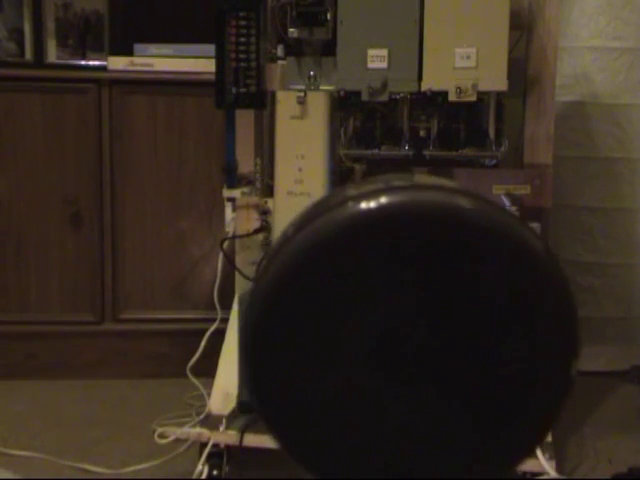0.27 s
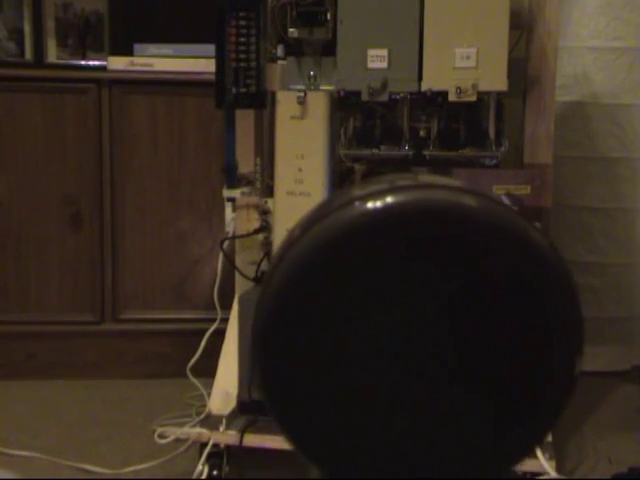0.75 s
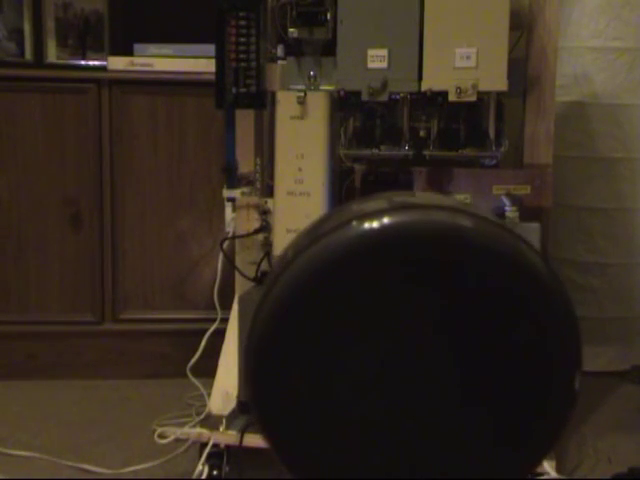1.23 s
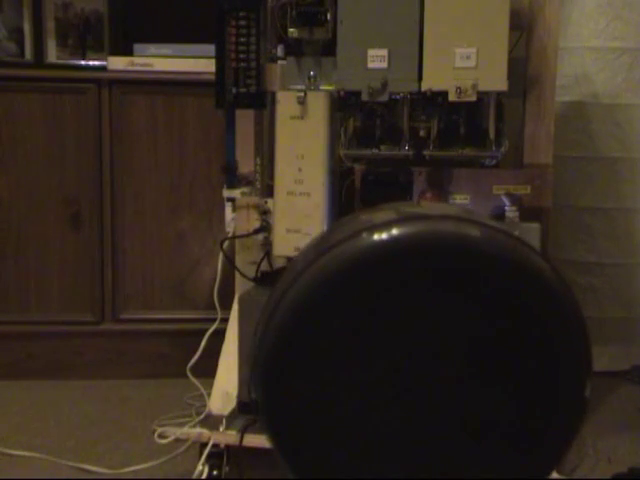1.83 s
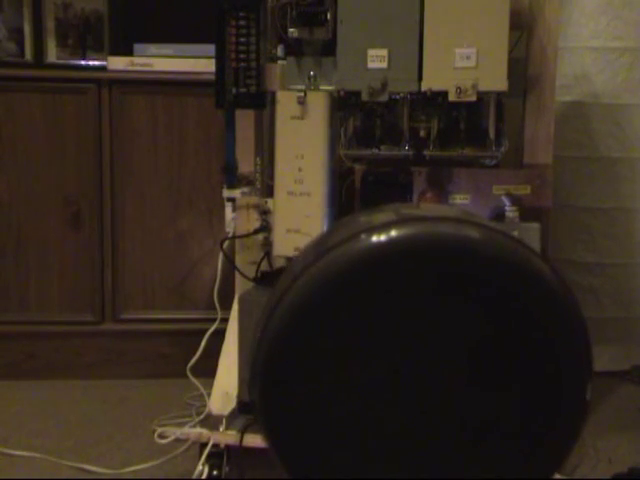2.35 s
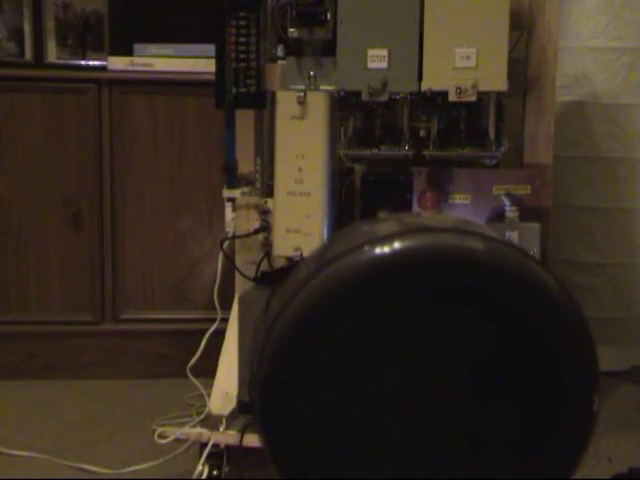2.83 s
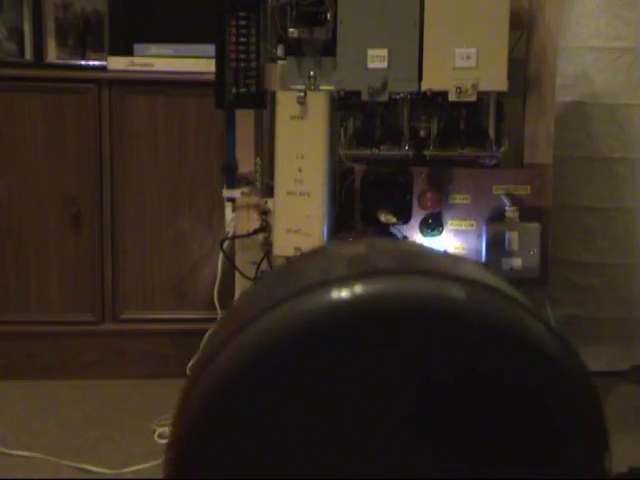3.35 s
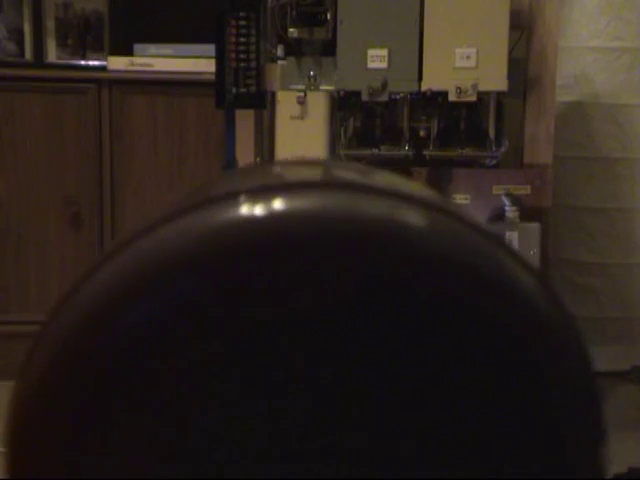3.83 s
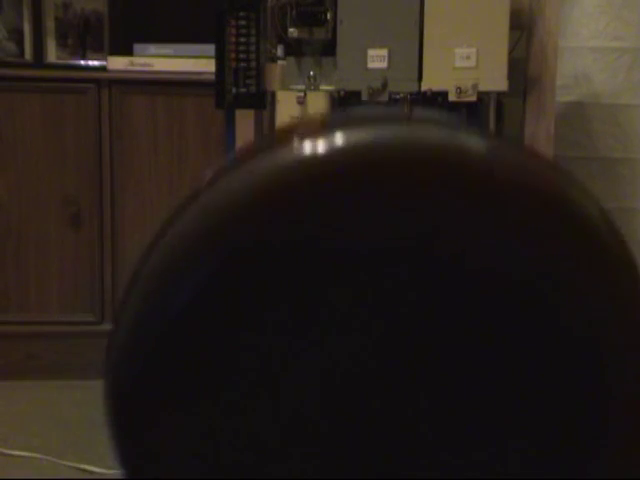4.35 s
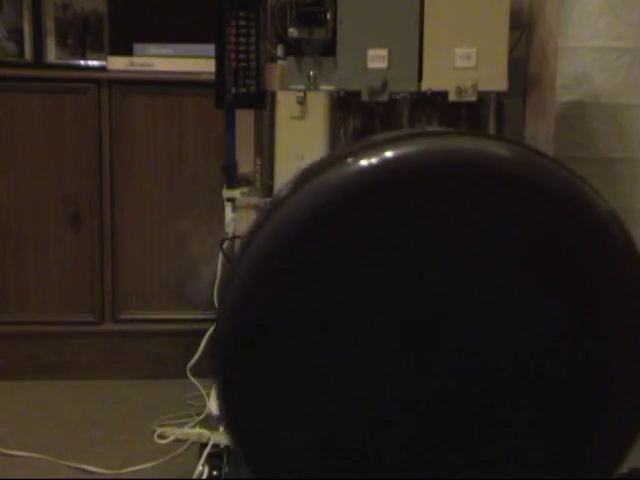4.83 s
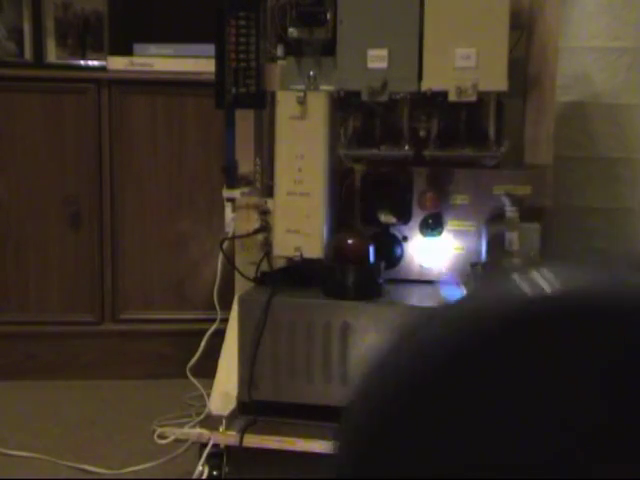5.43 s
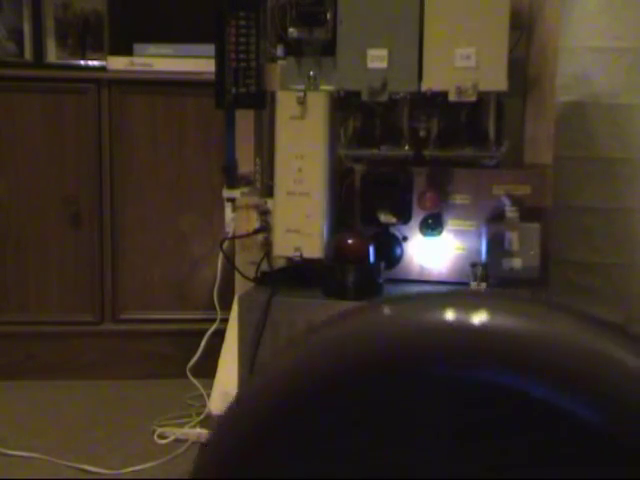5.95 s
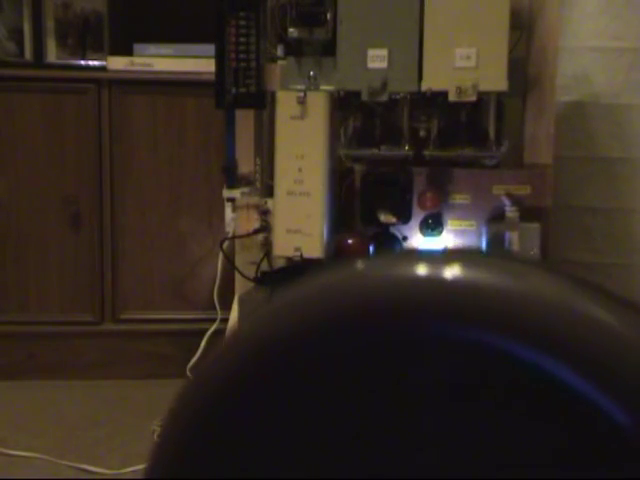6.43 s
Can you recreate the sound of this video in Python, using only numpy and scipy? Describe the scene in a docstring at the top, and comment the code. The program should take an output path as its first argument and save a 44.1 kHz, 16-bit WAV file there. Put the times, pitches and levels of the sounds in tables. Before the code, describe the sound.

Metallic telephone switchgear clatters in a living room as a dial is turned: scattered clacks, six quick double clacks, then ten more over faint hum.

```python
"""A living room, with a rotary telephone and a small step-by-step exchange that is sent 1, 6 and 0.
The finger winds the dial over its ratchet and its gears rustle home; shaped noise and clear modes make each knock.
On each pulse of the 6 and 0 a magnet pulls in and falls back, lifting the wiper shaft, then turning it.
The rack rings under the selectors and relays click; all are struck metalwork built from dense noise bands.
The earpiece snaps close by, and the power supply hums in wavering partials over a faint hiss."""
import sys
import numpy as np
from scipy import signal
from scipy.fft import rfft, irfft, next_fast_len
from scipy.io import wavfile

SR = 44100
rng = np.random.default_rng(int(sys.argv[2]) if len(sys.argv) > 2 else 0)


def master_out(mix):
    """Clip the mix to full scale and print it as 16-bit PCM to the path in sys.argv[1]."""
    frames = np.transpose(np.atleast_2d(mix))
    ceiling = np.clip(frames, -1, 1)
    pcm = np.round(ceiling * 32767).astype(np.int16)
    wavfile.write(sys.argv[1], SR, pcm)


N = 294940

# All event levels are relative; each source adds its own gain.
# First selector takes one step, then swings onto a free line: start_s, level_db, tilt_db_per_octave
FIRST_BLOWS = [(0.401, -19.5, 0.99), (0.41, -18.5, 1), (0.425, -4, 0.8), (0.497, -7, 0), (0.688, -10, 1),
               (0.697, -7, 1), (0.701, -11.5, 0.17), (0.759, -17.5, 0.99)]
# Relays in the rack: start_s, level_db, tilt_db_per_octave
RELAY_BLOWS = [(1.6138, -10.5, 0), (2.499, -22.5, -0.5), (4.9777, -7, 0.5), (6.203, -26, -1),
               (6.2214, -17, 1.5), (6.232, -19.5, 10), (6.243, -21, -2.2), (6.297, -21, -1.5),
               (6.311, -23.5, -1.5), (6.492, -17.5, 1)]
# Dial thuds against its stop: start_s, level_db
STOP_THUDS = [(0.069, -14), (1.284, -2.5), (3.264, -30), (4.687, -29.5)]
# Finger taps on the dial's wheel: start_s, level_db
FINGER_TAPS = [(0.002, -11.5), (0.044, -13), (0.065, -19), (0.193, -23.5), (1.044, -14.5), (1.078, -13),
               (1.395, -22.5), (2.792, -20.5), (2.801, -16.5), (2.831, -14.5), (3.263, -16), (4.759, -25.5)]
# Dry line clicks from the earpiece, close by: start_s, level_db
EARPIECE_CLICKS = [(1.0799, -9.5), (2.832, -13.5), (2.8365, -18), (6.4727, 1.5), (6.487, -21),
                   (6.5031, -11), (6.505, -8), (6.5395, -12.5)]

# Relative spectral density of each kind of blow: frequency_hz, density_db
FIRST_COLOUR = [(35, -47), (60, -23), (253, -9), (361, -8.5), (472, -2), (576, -7), (1220, -12.5),
                (1430, -12.5), (1990, -10), (2660, -20.5), (2970, -13), (9000, -19), (11000, -18.5),
                (12000, -53), (15600, -72), (22000, -120)]
LIFT_PULL_COLOUR = [(35, -41), (60, -48), (107, -5), (203, -16), (248, -7.5), (386, -5.5), (602, -3),
                    (839, -8), (897, -8.5), (3470, -11.5), (10000, -17), (11200, -16), (12000, -40),
                    (15600, -65), (22000, -120)]
LIFT_FALL_COLOUR = [(35, -50), (60, -27), (152, -17), (378, 0), (703, 1.5), (980, -6.5), (1460, 0.5),
                    (1990, -7.5), (2660, -3.5), (3040, -10.5), (3390, -8.5), (5900, -14), (8230, -10),
                    (11000, -17), (12000, -38), (15600, -65), (22000, -120)]
TURN_PULL_COLOUR = [(35, -69), (60, -28), (203, -6), (277, -14), (386, 0.5), (451, -1.5), (839, -8),
                    (917, -10), (1070, -6), (1430, 0), (2180, -11.5), (3320, -13), (8230, -19.5),
                    (11000, -18.5), (12000, -46), (15600, -75), (22000, -120)]
TURN_FALL_COLOUR = [(60, -35), (150, 0), (300, 8), (600, 5), (1400, 5.5), (2000, 3), (2800, 6), (4000, 0.5),
                    (6000, -1), (8000, 2), (11500, -6)]
RELAY_COLOUR = [(88, -53), (150, -12.5), (615, -6.5), (938, -7.5), (1310, 0.5), (1720, -5.5), (3210, -8),
                (5260, -14.5), (7870, -9), (11200, -16), (12000, -41), (15600, -63), (22000, -120)]
TAP_COLOUR = [(59, -45), (100, -20), (507, 0), (1150, -1.5), (2230, -7), (2890, -1.5), (3680, -12.5),
              (4500, -3.5), (5830, -16), (6320, -9), (8540, -12.5), (12000, -19), (15600, -58),
              (22000, -120)]
STOP_COLOUR = [(59, -67), (100, -37), (406, 0.5), (477, -2.5), (671, -9.5), (1040, -9), (1180, -9),
               (1350, -10), (6990, -31.5), (10400, -25), (12000, -47), (15600, -83), (22000, -120)]
RATCHET_COLOUR = [(200, -26), (500, 8), (900, -2.5), (1330, 4), (1700, -0.5), (3700, -3.5), (4300, 2.5),
                  (5300, -2.5), (7000, 0), (11500, -12.5)]
EARPIECE_COLOUR = [(88, -52), (150, -13), (2220, -15), (2980, -4), (4300, -10), (5260, -25), (5870, -14),
                   (7050, -26), (8630, -26), (9630, -37), (11400, -20), (12000, -38), (15600, -68),
                   (22000, -120)]
PAWL_COLOUR = [(300, -10), (2000, -1), (5000, -11), (8000, 5.0), (11500, -13)]
# Filter outlines of the gears' rustle and the background hiss: frequency_hz, relative_gain_db
WHIRR_COLOUR = [(88, -49), (150, -12), (213, -37), (301, 3.5), (375, -9), (476, -1.5), (562, -11),
                (687, -5), (872, -14.5), (1310, -13.5), (1510, -19), (1920, -12.5), (2390, -19.5),
                (6430, -21.5), (12000, -29), (15600, -62), (22000, -120)]
HISS_COLOUR = [(15, -50), (25, -16), (98, -4), (243, -9.5), (306, -13), (451, -10.5), (600, -10.5),
               (1200, -11.5), (1300, -9), (1440, -10.5), (2480, -22), (2970, -21), (6460, -17.5),
               (9270, -20), (12000, -29.5), (15600, -65), (22000, -120)]

# Clear modes of the rack and of the telephone's case: pitch_hz, relative_level_db, t60_s
RACK_MODES = [(267.45, 0, 0.37), (309.9, 3, 0.36), (381, 2.5, 0.33), (555, -6.5, 0.43), (614, -6, 0.092),
              (698, -3.5, 0.21), (838, 10.5, 0.093), (1070, 1, 0.19), (1360, -18, 0.073), (1517, -21, 0.13),
              (1626, 5, 0.18), (2380, -18, 0.12), (2480, 6, 0.067)]
CASE_MODES = [(400.4, 12.5, 0.11), (509, 16, 0.14), (606, -12, 0.41), (1380, 4, 0.22), (4000, -13, 0.099)]
# Resonances of each mechanism's steel parts: pitch_hz, width_hz, peak_gain_db
FIRST_STEEL = [(424, 18, 6.5), (1430, 65, 5.5), (2610, 100, 8), (2690, 150, 10), (3620, 89, 6),
               (4820, 52, 4), (8300, 110, 7), (8930, 120, 10), (10300, 110, 6)]
LIFT_STEEL = [(263.4, 6.2, 10.9), (386.5, 15, 6.2), (780, 37, 4.1), (2460, 16, 4.3), (2530, 31, 6),
              (2790, 30, 5.1), (3410, 130, 6.8), (3880, 48, 6.8), (4410, 200, 7.2), (6530, 41, 4.1),
              (8230, 70, 6.4), (8360, 130, 6.8), (9100, 180, 4.4), (9800, 110, 3.5)]
TURN_STEEL = [(2610, 73, 5.4), (2650, 55, 3.6), (3400, 98, 6.1), (3550, 63, 5.3), (5420, 230, 6.2),
              (6600, 30, 2.6), (7800, 56, 4), (8260, 260, 4.7), (9670, 230, 4.8)]
RELAY_STEEL = [(626, 46, 5.8), (1280, 81, 3.6), (3420, 230, 7.8), (4250, 120, 7), (7870, 240, 5.9),
               (8900, 88, 4.7)]
DIAL_STEEL = [(1340, 31, 9.8), (2240, 71, 2.6), (4250, 110, 6.8)]
# Resonances of the earpiece's diaphragm: pitch_hz, width_hz, peak_gain_db
DIAPHRAGM = [(3060, 390, 20.4), (4060, 380, 16.7), (5900, 630, 6), (8540, 500, 2)]
# Power supply partials, before they waver: pitch_hz, rms_level_db
HUM_PARTIALS = [(100, -56.5), (300, -62.5), (600, -66), (900, -77), (1000, -68.5), (1100, -63.5),
                (1200, -74), (1500, -66.5), (1600, -81), (1700, -69), (1900, -67), (2000, -70), (2100, -65),
                (2200, -69), (2500, -64.5)]

# Stereo width of the blows, and of hiss and gears: frequency_hz, side_minus_mid_db
BLOW_WIDTH = [(60, -9), (110, -11), (200, -17), (350, -16), (640, -11), (1150, -7.5), (2100, -7.5),
              (3800, -9), (7000, -10), (11500, -9)]
DIFFUSE_WIDTH = [(60, -21), (110, -28), (200, -13), (350, -11.5), (640, -6), (1150, -1.5), (2080, -1.5),
                 (3760, -6.5), (6790, -32), (12300, -29)]
# Stereo balance: frequency_hz, left_minus_right_db
BALANCE = [(60, 3), (110, -0.5), (200, 0.0), (350, -0.5), (640, -1.0), (1150, -2.5), (2080, -2.5),
           (3760, -1.5), (6790, 0.5), (12300, -1)]

# Evenly spaced pulses from the dial's governor: first_pull_s, period_s, hold_s
LIFT_DIGIT = (1.6309, 0.1048, 0.0607)
TURN_DIGIT = (4.9869, 0.10445, 0.0741)
# Finger winds the dial in pushes of even speed: start_s, end_s, teeth_per_s, tick_level_db
PUSHES = [(1.1378, 1.283, 40, -18), (2.928, 2.97, 38, -18), (2.9897, 3.045, 25.4, -18.5),
          (3.057, 3.14, 44.5, -18), (3.156, 3.25, 27, -22.5)]
# Wheel slips under the finger or runs home: start_s, end_s, gear_level_db
RUNS = [(0.09, 0.42, -35.5), (0.96, 1.015, -43), (1.35, 2.22, -36), (3.27, 3.36, -49), (4.69, 4.72, -40),
        (4.762, 6.0, -35.5)]

BANDS_HZ = 50 * 2 ** (np.arange(33) / 4)
RING_S = np.arange(SR * 3 // 5) / SR
TOP_HZ = 11750
HISS_DB = -49  # rms
# relative levels of the magnets' blows, and their spread from pulse to pulse
LIFT_PULL_DB, LIFT_FALL_DB, TURN_PULL_DB, TURN_FALL_DB = -6.5, -1.65, -8.5, -5
PULSE_SPREAD_DB, TOOTH_SPREAD_DB = 0.95, 0.6
# rise and fall of the gears' rustle, and its level relative to the ratchet ticks' level
GEAR_ATTACK_S, GEAR_RELEASE_S, WINDING_GEAR_DB = 0.01, 0.04, -23.5


def undb(db):
    """Decibels to gain."""
    return np.exp(np.asarray(db) * (np.log(10) / 20))


def gain_at(hz, outline):
    """Gain of an outline, read on a logarithmic frequency scale."""
    outline_hz, outline_db = np.transpose(outline)
    return undb(np.interp(np.log(hz + 1), np.log(outline_hz), outline_db))


def unit(x):
    """Scale to rms 1."""
    return x / np.sqrt(np.mean(x ** 2))


def colour(x, outline):
    """Filter by an outline in the frequency domain."""
    size = next_fast_len(x.shape[-1], True)
    gains = gain_at(np.fft.rfftfreq(size, 1 / SR), outline)
    return irfft(rfft(x, size) * gains, size)[..., :x.shape[-1]]


def resonate(x, peaks):
    """Narrow resonances ring on above the rest of a sound."""
    out = x
    for hz, width_hz, gain_db in peaks:
        b, a = signal.iirpeak(hz, hz / width_hz, fs=SR)
        out = out + (undb(gain_db) - 1) * signal.lfilter(b, a, x)
    return out


def add(out, start_s, sound):
    """Mix a sound in at a time."""
    start = max(int(start_s * SR), 0)
    out[:, start:start + sound.shape[-1]] += sound[..., :N - start]


def stereo(mid, side, width):
    """Left and right from a direct and a scattered part."""
    return mid + np.array([[1], [-1]]) * colour(side, width)


def band_noises():
    """Quarter-octave stereo noises (band, channel, time): the dense modes of metalwork and room."""
    size = 2 * SR
    octaves = np.log2(np.fft.rfftfreq(size, 1 / SR) + 1)
    spectrum = rfft(stereo(*rng.standard_normal((2, size)), BLOW_WIDTH))
    noises = []
    for hz in BANDS_HZ:
        band_gain = np.maximum(1 - 4 * abs(octaves - np.log2(hz)), 0)
        noises.append(unit(irfft(spectrum * band_gain)))
    return np.array(noises, np.float32)


def fade(t60_s, rise_s):
    """Power over time of a ring that builds up and dies; it sums to 1."""
    t = RING_S.astype(np.float32)
    decay, build = (np.exp(-np.minimum(t * np.float32(rate), 20))
                    for rate in (np.log(1000) / t60_s, 1 / rise_s))
    power = (decay * (1 - build)) ** 2
    return power / power.sum(axis=-1, keepdims=True)


def envelope(crack_db, crack_t60, body_t60, room_db):
    """Amplitude by band and time: bright crack, metalwork, room, faint late ring; lows come late and stay."""
    khz = BANDS_HZ[:, None] / 1000
    # t60 in seconds, at 1 kHz where it varies with pitch; the levels set shares of the energy
    crack = undb(crack_db + 2.5 * np.log2(khz / 4)) ** 2 * fade(crack_t60, crack_t60 / 30)
    body = fade(body_t60 * khz ** -0.37, 0.007 * khz ** -0.8)
    room = undb(room_db) ** 2 * fade(0.35 * khz ** -0.24, 0.0078)
    late = undb(-23) ** 2 * fade(2.2 * khz ** -0.3, 0.0084)
    power = crack + body + room + late
    return np.sqrt(power / power.sum(axis=1, keepdims=True)).astype(np.float32)


def modes(table, rise_s):
    """Clear modes of a struck object (mode, channel, time), reaching each side with their own phase."""
    rings = []
    for hz, level_db, t60_s in table:
        phase = rng.normal(0, 0.3, (2, 1))
        rings.append(undb(level_db - 60 * RING_S / t60_s) * np.sin(2 * np.pi * hz * RING_S + phase))
    return np.array(rings) * (1 - np.exp(-RING_S / rise_s))


def rattle(rattle_db=1.0, rattle_hz=330):
    """Contact springs chatter after a blow, so its ring dies in little spurts."""
    spurts_db = rattle_db * (rng.exponential(size=len(RING_S)) - 1)
    spurts_db[:2] = 0  # the blow itself comes first
    return undb(spurts_db[(RING_S * rattle_hz).astype(int)]).astype(np.float32)


def blows(noises, events, outline, shape, gain_db, change, ring=(), scatter_db=3.5):
    """One part strikes repeatedly: a shared dense ring, with a share of power that changes each blow."""
    size = len(RING_S)
    shared_start, *starts = rng.integers(0, noises.shape[-1] - size, len(events) + 1)
    change = np.clip(change, 0, 1)
    shared = noises[..., shared_start:shared_start + size] * float(np.sqrt(1 - change))
    out = np.zeros((2, N))
    for (start_s, level_db, *tilt), noise_start in zip(events, starts):
        tilt_db = tilt[0] if tilt else 0
        bands = noises[..., noise_start:noise_start + size] * float(np.sqrt(change))
        bands += shared
        bands *= shape[:, None]
        bands[np.searchsorted(BANDS_HZ, 1000):] *= rattle()  # only from about 1 kHz up
        # wider bands hold more energy; the tilt pivots at 2 kHz
        weight = gain_at(BANDS_HZ, outline) * np.sqrt(BANDS_HZ) * undb(tilt_db * np.log2(BANDS_HZ / 2000))
        weight /= np.linalg.norm(weight) * np.sqrt(np.einsum("bct,bct->b", bands, bands))
        dense = np.einsum("b,bct->ct", weight.astype(np.float32), bands)
        dense *= np.sqrt(2 * SR / 100)  # level is energy spread over a hundredth of a second
        # each blow wakes the clear modes a little differently
        clear = sum(undb(scatter_db * rng.standard_normal()) * mode for mode in ring)
        add(out, start_s, undb(level_db + gain_db) * (dense + clear))
    return out


def background(waver=0.16):
    """The power supply buzzes in multiples of twice the mains frequency, wavering, over a faint hiss."""
    t = np.arange(N) / SR
    knots_s = np.linspace(0, t[-1], num=30)
    hum = np.zeros(N)
    for hz, level_db in HUM_PARTIALS:
        swell = np.interp(t, knots_s, 1 + waver * rng.standard_normal(len(knots_s)))
        hum += undb(level_db) * np.sqrt(2) * swell * np.sin(2 * np.pi * (hz * t + rng.random()))
    noise = stereo(*rng.standard_normal((2, N)), DIFFUSE_WIDTH)
    return hum + undb(HISS_DB) * unit(colour(noise, HISS_COLOUR))


def relays(noises):
    """Light relay armatures close under their covers."""
    shape = envelope(crack_db=-5.5, crack_t60=0.035, body_t60=0.15, room_db=-1.5)
    armatures = blows(noises, RELAY_BLOWS, RELAY_COLOUR, shape, gain_db=-12, change=0.52)
    return resonate(armatures, RELAY_STEEL)


def earpiece(noises):
    """Steps in the line current snap the earpiece's diaphragm close by; the room answers faintly."""
    snap = resonate(signal.unit_impulse(len(RING_S)), DIAPHRAGM)
    snap = signal.sosfilt(signal.butter(2, 5500, fs=SR, output="sos"), snap)
    snap /= abs(snap).max()
    shape = envelope(crack_db=-6, crack_t60=0.02, body_t60=0.034, room_db=-5)
    out = blows(noises, EARPIECE_CLICKS, EARPIECE_COLOUR, shape, gain_db=-33, change=0.32)
    for start_s, level_db in EARPIECE_CLICKS:
        add(out, start_s, undb(level_db) * snap)
    return out


def ratchet_teeth():
    """One tick for each tooth that passes the pawl during a push, as rows (start_s, level_db)."""
    ticks = []
    for start_s, end_s, teeth_per_s, level_db in PUSHES:
        for tooth_s in np.arange(start_s, end_s, 1 / teeth_per_s):
            ticks.append((tooth_s, level_db + TOOTH_SPREAD_DB * rng.standard_normal()))
    return ticks


def gear_drive(t):
    """Level of the gears: they start quickly, hold while the wheel turns and die away when it stops."""
    winding = [(start_s, end_s, db + WINDING_GEAR_DB) for start_s, end_s, _, db in PUSHES]
    drive = np.zeros(len(t))
    for start_s, end_s, level_db in list(RUNS) + winding:
        attack = np.clip((t - start_s) / GEAR_ATTACK_S, 0, 1)
        drive += undb(level_db) * attack * np.exp(-np.maximum(t - end_s, 0) / GEAR_RELEASE_S)
    return drive


def gears(tooth_hz=96, grain_db=1.0, whirr_db=-3):
    """Meshing teeth make a rustle of short decaying noise grains, of uneven level, while the dial turns."""
    t = np.arange(N) / SR
    tooth_gain = undb(grain_db * rng.standard_normal(N)[(t * tooth_hz).astype(int)])
    teeth = tooth_gain * np.exp(-(t * tooth_hz % 1) / 1.7)
    noise = stereo(*rng.standard_normal((2, N)), DIFFUSE_WIDTH)
    rustle = unit(colour(noise * teeth, WHIRR_COLOUR))
    return undb(whirr_db) * rustle * gear_drive(t)


def dial(noises):
    """Thuds, taps and ratchet ticks ring the telephone's case; steel parts colour the ticks and gears."""
    case = modes(CASE_MODES, rise_s=0.0011)
    stop_shape = envelope(crack_db=-0.5, crack_t60=0.083, body_t60=0.045, room_db=-8)
    stops = blows(noises, STOP_THUDS, STOP_COLOUR, stop_shape, gain_db=-12.5, change=0.49,
                  ring=undb(-16) * case)
    tap_shape = envelope(crack_db=0.5, crack_t60=0.027, body_t60=0.078, room_db=-4)
    taps = blows(noises, FINGER_TAPS, TAP_COLOUR, tap_shape, gain_db=-13.5, change=0.82,
                 ring=undb(-25) * case)
    tick_shape = envelope(crack_db=-2.5, crack_t60=0.014, body_t60=0.16, room_db=-5.5)
    ticks = blows(noises, ratchet_teeth(), RATCHET_COLOUR, tick_shape, gain_db=-13.5, change=0.68,
                  ring=undb(-30) * case)
    return stops + taps + resonate(ticks + gears(), DIAL_STEEL)


def pulse_train(digit, pull_db, fall_db, count):
    """A magnet's pulls and falls for one dialled digit, each as rows (start_s, level_db)."""
    first_s, period_s, hold_s = digit
    pull_s = first_s + period_s * np.arange(count)
    spread_db = PULSE_SPREAD_DB * rng.standard_normal((count, 2))
    pulls = np.column_stack([pull_s, pull_db + spread_db[:, 0]])
    falls = np.column_stack([pull_s + hold_s, fall_db + spread_db[:, 1]])
    return pulls, falls


def pawls(noises, falls, lead_s=0.0075):
    """Just before an armature lands, its pawl slips back over a ratchet tooth."""
    slips = [(fall_s - lead_s, level_db) for fall_s, level_db in falls]
    shape = envelope(crack_db=-11, crack_t60=0.04, body_t60=0.055, room_db=-24)
    return blows(noises, slips, PAWL_COLOUR, shape, gain_db=-25, change=0.31)


def selectors(noises, lift_pulls, lift_falls, turn_pulls, turn_falls):
    """Armatures slam onto their magnets and drop back onto their stops; the rack rings under them."""
    rack = modes(RACK_MODES, rise_s=0.018)
    first_shape = envelope(crack_db=0, crack_t60=0.048, body_t60=0.17, room_db=-0.5)
    first = blows(noises, FIRST_BLOWS, FIRST_COLOUR, first_shape, gain_db=-5.5, change=0.67,
                  ring=undb(-21) * rack)
    lift_pull_shape = envelope(crack_db=-3, crack_t60=0.058, body_t60=0.24, room_db=-3)
    lift = blows(noises, lift_pulls, LIFT_PULL_COLOUR, lift_pull_shape, gain_db=-6.5, change=0.49,
                 ring=undb(-21) * rack)
    lift_fall_shape = envelope(crack_db=-5, crack_t60=0.015, body_t60=0.22, room_db=-4.5)
    lift += blows(noises, lift_falls, LIFT_FALL_COLOUR, lift_fall_shape, gain_db=-7.5, change=0.36,
                  ring=undb(-19.5) * rack)
    turn_pull_shape = envelope(crack_db=-8.5, crack_t60=0.029, body_t60=0.096, room_db=-3.5)
    turn = blows(noises, turn_pulls, TURN_PULL_COLOUR, turn_pull_shape, gain_db=-3.5, change=0.21,
                 ring=undb(-5.5) * rack)
    turn_fall_shape = envelope(crack_db=1, crack_t60=0.017, body_t60=0.3, room_db=-3)
    turn += blows(noises, turn_falls, TURN_FALL_COLOUR, turn_fall_shape, gain_db=-8, change=0.3,
                  ring=undb(-23) * rack)
    steel = resonate(first, FIRST_STEEL) + resonate(lift, LIFT_STEEL) + resonate(turn, TURN_STEEL)
    return undb(-1) * steel


def scene():
    """Six pulses lift the wiper shaft and ten turn it; exchange and telephone stand a little to the right."""
    noises = band_noises()
    lift_pulls, lift_falls = pulse_train(LIFT_DIGIT, LIFT_PULL_DB, LIFT_FALL_DB, count=6)
    turn_pulls, turn_falls = pulse_train(TURN_DIGIT, TURN_PULL_DB, TURN_FALL_DB, count=10)
    room = background() + relays(noises)
    telephone = earpiece(noises) + dial(noises)
    stepping = pawls(noises, [*lift_falls, *turn_falls])
    stepping += selectors(noises, lift_pulls, lift_falls, turn_pulls, turn_falls)
    left, right = room + telephone + stepping
    left_balance = [(hz, db / 2) for hz, db in BALANCE]
    right_balance = [(hz, -db / 2) for hz, db in BALANCE]
    return np.array([colour(left, left_balance), colour(right, right_balance)])


def record(dry, ceiling=0.87):
    """Rounds the highest peaks and keeps only sound below about 12 kHz."""
    rounded = ceiling * np.tanh(dry / ceiling)
    top_cut = signal.ellip(10, 0.2, 80, TOP_HZ, fs=SR, output="sos")
    return signal.sosfilt(top_cut, rounded)


dry = scene()
out = record(dry)
master_out(out)
```